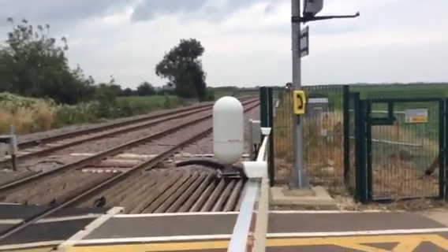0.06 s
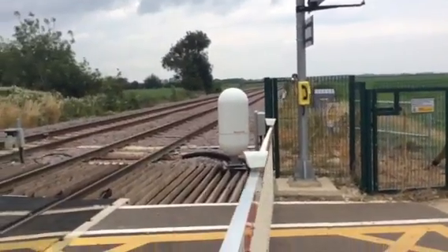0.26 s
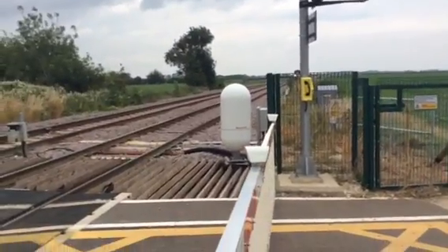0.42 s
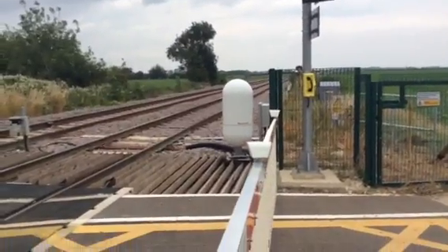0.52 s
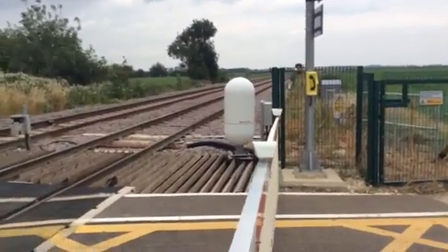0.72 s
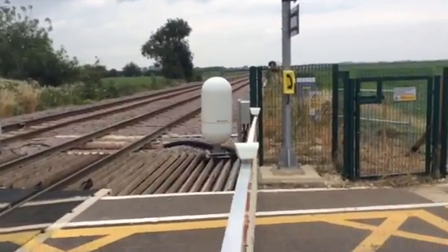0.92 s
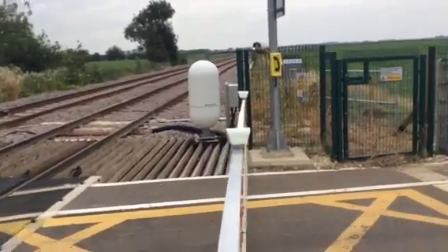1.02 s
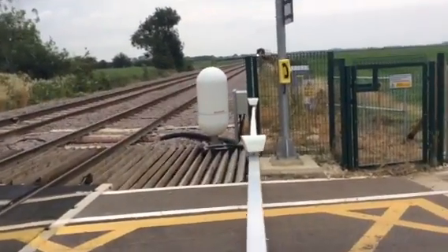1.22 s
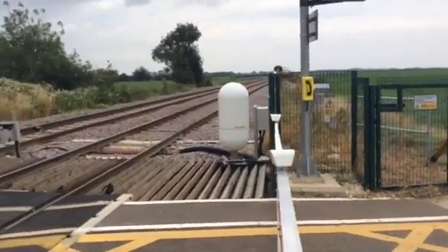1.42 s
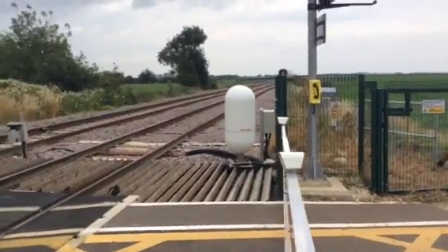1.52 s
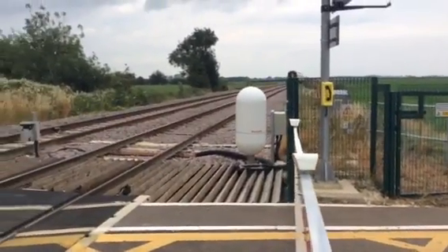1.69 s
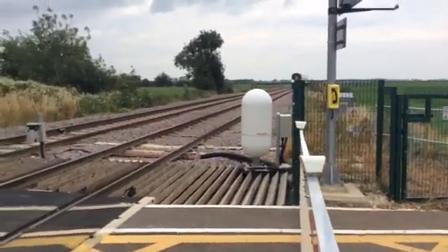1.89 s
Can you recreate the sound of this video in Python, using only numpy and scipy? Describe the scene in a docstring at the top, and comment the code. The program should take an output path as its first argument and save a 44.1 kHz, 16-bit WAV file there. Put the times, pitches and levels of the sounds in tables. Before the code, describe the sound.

Steel rails whine and ring from a distant train, with wind bumping the microphone.

```python
"""Singing rails at a country crossing

One microphone at a quiet level crossing. A far-off train sets the rails ringing: a cluster of narrow
whining resonances, the strongest of which swells and stops, over a wash that grows and brightens.
Wind rumbles and bumps on the microphone; a distant bird holds one thin note over a faint hiss."""
import sys
import numpy as np
from scipy import signal
from scipy.fft import rfft, irfft
from scipy.io import wavfile

SR = 44100
rng = np.random.default_rng(int(sys.argv[2]) if len(sys.argv) > 2 else 0)


def master_out(mix):
    """Clip the mix to full scale and print it as 16-bit PCM to the path in sys.argv[1]."""
    frames = np.transpose(np.atleast_2d(mix))
    ceiling = np.clip(frames, -1, 1)
    pcm = np.round(ceiling * 32767).astype(np.int16)
    wavfile.write(sys.argv[1], SR, pcm)


N = 85995


def undb(db):
    """Decibels to gain."""
    return 10 ** (np.asarray(db) / 20)


def clock():
    """Time of every sample in seconds."""
    return np.arange(N) / SR


def curves(table):
    """The columns of a table, joined by straight lines in time."""
    rows = np.array(table, float)
    return [np.interp(clock(), rows[:, 0], column) for column in rows[:, 1:].T]


def shaped(gain):
    """Noise of rms 1 whose spectrum follows gain(hz)."""
    hz = np.maximum(np.arange(N // 2 + 1) * SR / N, 1)
    x = irfft(rfft(rng.standard_normal(N)) * gain(hz), N)
    return x / x.std()


def noise(spectrum):
    """Noise coloured by (freq_hz, relative_db) points, dying away beyond the ends."""
    hz, db = np.array(spectrum, float).T

    def gain(f):
        skirts = np.minimum(1, np.minimum(f / hz[0], hz[-1] / f)) ** 2
        return undb(np.interp(np.log(f), np.log(hz), db)) * skirts
    return shaped(gain)


def ring(hz, half_width_hz):
    """A resonance kept ringing by random pushes."""
    return shaped(lambda f: 1 / (1 + ((f - hz) / half_width_hz) ** 2))


def waver(rate_hz):
    """A slow random wavering of spread 1."""
    return shaped(lambda f: 1 / (1 + (f / rate_hz) ** 2) ** 2)


def tone(hz):
    """A sine of rms 1 on a moving pitch."""
    return np.sqrt(2) * np.sin(2 * np.pi * (np.cumsum(hz) / SR + rng.random()))


def swell(peak_s, half_length_s):
    """A smooth rise and fall around one moment."""
    return np.exp(-.5 * np.minimum(((clock() - peak_s) / half_length_s) ** 2, 100))


def rise(db_per_s):
    """Gain that grows steadily; 1 half way through."""
    return undb(db_per_s * (clock() - N / SR / 2))


# Rail resonances at the crossing, middle and high: pitch_hz, half_width_hz, relative_db
RAIL_MODES = [(1090, 14, -69), (1125, 14, -69), (1181, 6, -62), (1238, 9, -65), (1345, 14, -65),
              (1453, 8, -67), (1549, 10, -67), (1615, 12, -73), (1712, 9, -72), (1760, 8, -75),
              (1840, 9, -75), (1946, 8, -71), (2093, 8, -75)]
RAIL_HIGH_MODES = [(7080, 350, -86), (10240, 900, -80.5), (13300, 600, -80.5)]
# Colours of the rails' dull and bright washes: freq_hz, relative_db
DULL_WASH_SPECTRUM = [(600, -22), (900, -17), (1100, -6.5), (1300, 0.5), (1550, -12), (1780, -12),
                      (2050, -23), (2400, -28.5)]
BRIGHT_WASH_SPECTRUM = [(700, -35), (950, -12.5), (1150, -4.5), (1300, -0.5), (1650, -2), (1950, -5.5),
                        (2100, -9), (2200, -14.5), (2450, -22), (3000, -48)]
# The two washes, with the train still far down the line: time_s, dull_db, bright_db
WASH_LEVELS = [(0, -55.5, -72), (.5, -55.5, -66.5), (.65, -52.5, -64), (1.1, -56.5, -57),
               (1.22, -57, -56.5), (1.35, -57, -60), (1.6, -62, -54), (1.95, -60, -51.5)]
# A thin top tone off the rails: time_s, level_db
THIN_TONE_LEVELS = [(0, -102), (.55, -92), (1.0, -81), (1.25, -77), (1.5, -80), (1.95, -77)]


def rails():
    """Distant wheels keep the rails ringing in narrow resonances and a wash, louder as they near."""
    modes = sum(undb(db) * ring(hz, width) for hz, width, db in RAIL_MODES)
    modes = undb(-1.5) * modes * rise(db_per_s=7.5)
    high_modes = sum(undb(db) * ring(hz, width) for hz, width, db in RAIL_HIGH_MODES)
    dull_db, bright_db = curves(WASH_LEVELS)
    wash = undb(dull_db) * noise(DULL_WASH_SPECTRUM) + undb(bright_db) * noise(BRIGHT_WASH_SPECTRUM)
    thin_tone = undb(curves(THIN_TONE_LEVELS)[0]) * ring(hz=11480, half_width_hz=110)
    return modes + high_modes * rise(db_per_s=3) + wash + thin_tone


# Tones of the rails' whine, lowest first: pitch_hz, wander_hz, relative_db
WHINE_TONES = [(1290.5, 1.5, -4), (1321, 6, -10), (1345, 2, 0), (1363, 6, -6.5), (1453, 3, -13),
               (1552, 4, -14)]
# The whine's swell, heard from the crossing: time_s, lowest_tone_db, upper_tones_db
WHINE_LEVELS = [(0, -55, -68), (.12, -66, -74), (.25, -47, -62.5), (.45, -61.5, -59.5), (.6, -50, -54),
                (.85, -70, -52.5), (1.02, -44.5, -49.5), (1.175, -68, -47.5), (1.21, -73, -62),
                (1.4, -72, -95)]


def rail_whine():
    """A few nearly pure rail tones beat together, swell and stop."""
    lowest_db, upper_db = curves(WHINE_LEVELS)
    out = 0
    for k, (hz, wander_hz, db) in enumerate(WHINE_TONES):
        swell_db = upper_db if k else lowest_db
        flutter_db = 0.96 * waver(rate_hz=29)
        out += undb(db + swell_db + flutter_db) * tone(hz + wander_hz * waver(rate_hz=22.5))
    return out


# Gusts right on the microphone: time_s, rumble_db, flutter_db
GUST_LEVELS = [(0, -49, -52.5), (.12, -41, -61), (.22, -41.5, -54), (.3, -40, -43.5), (.345, -40.5, -38.5),
               (.378, -38.5, -55.5), (.435, -37.5, -33.5), (.468, -40, -38.5), (.49, -40.5, -46),
               (.53, -31, -34), (.575, -54, -64), (.66, -50.5, -96), (.71, -66, -80), (.77, -47.5, -62),
               (.86, -53.5, -79), (1, -46, -57), (1.035, -56, -61), (1.07, -48, -39.5), (1.1, -37.5, -48),
               (1.135, -52, -66.5), (1.23, -59, -88), (1.62, -57, -74), (1.73, -51.5, -52),
               (1.82, -53.5, -70.5), (1.95, -55, -67)]
# Colours of their rumble and flutter: freq_hz, relative_db
RUMBLE_SPECTRUM = [(15, -26), (30, -13), (50, 3.5), (80, 1.5), (140, 3), (200, -3), (300, -13.5),
                   (500, -44), (900, -61)]
FLUTTER_SPECTRUM = [(50, -17), (120, 1.5), (200, 3.5), (310, 0), (420, -1), (600, -8.5), (800, -26),
                    (1100, -34), (2000, -55)]


def wind():
    """A low rumble, with ragged flutter when the gusts reach the microphone."""
    rumble_db, flutter_db = curves(GUST_LEVELS)
    rumble = undb(rumble_db + 1.5 * waver(rate_hz=38)) * noise(RUMBLE_SPECTRUM)
    flutter = undb(flutter_db + 2.0 * waver(rate_hz=47)) * noise(FLUTTER_SPECTRUM)
    return rumble + flutter


# Brief soft rustles at the crossing: peak_s, half_length_s, level_db
RUSTLES = [(0.001, 0.024, -59.5), (0.185, 0.016, -67), (0.29, 0.036, -73), (0.752, .025, -68),
           (.825, 0.015, -68.5)]
# Colours of the country air all around and of the rustles: freq_hz, relative_db
AIR_SPECTRUM = [(200, 4.5), (500, -4.5), (850, 2), (2400, -5), (3300, -5), (4500, -9.5), (6200, -18),
                (8500, -15), (10500, -14), (12500, -16), (14000, -19), (15500, -15)]
RUSTLE_SPECTRUM = [(2500, 0.5), (4500, -3.5), (6000, -6.5), (8500, -4), (12000, -1), (15000, -16)]


def country_air():
    """Faint hiss that slowly grows, and a few soft rustles."""
    hiss = undb(-67) * rise(db_per_s=4) * noise(AIR_SPECTRUM)
    rustling = sum(undb(db) * swell(peak_s, half_s) for peak_s, half_s, db in RUSTLES)
    return hiss + rustling * noise(RUSTLE_SPECTRUM)


# A bird's note, far from the microphone: time_s, pitch_hz
BIRD_PITCH = [(0, 5220), (.14, 5150), (.17, 5085), (.2, 5055), (.27, 5095), (.4, 5090)]
# The same note as it reaches the crossing: time_s, level_db
BIRD_LEVELS = [(0, -89), (.11, -75), (.145, -72.5), (.2, -70), (.27, -72.5), (.37, -82.5), (.41, -100)]


def bird(wander_hz=14, side_tone_below_hz=200):
    """One thin held whistle that sags a little, with a weaker tone below."""
    hz = curves(BIRD_PITCH)[0] + wander_hz * waver(rate_hz=100)
    level_db = curves(BIRD_LEVELS)[0] + 2.2 * waver(rate_hz=60)
    return undb(level_db) * (tone(hz) + undb(-14) * tone(hz - side_tone_below_hz))


# Eddies striking the microphone: peak_s, peak_db, centre_hz, half_length_cycles, churn_db
EDDIES = [(.245, -26.5, 287, 1.32, -44), (.288, -21, 240, 0.38, -44), (.335, -20.5, 253, 0.32, -38.5),
          (.344, -19.5, 185, 0.56, -33), (.359, -30, 150, 0.56, -53), (.391, -20, 151, 0.36, -69),
          (.406, -27, 383, 0.53, -55), (.431, -28.5, 280, 2.5, -44), (.483, -25, 330, 0.31, -48),
          (.506, -13.5, 161, 0.38, -31.5), (.514, -25, 275, 1.15, -37), (.528, -15.5, 140, 0.61, -37.5),
          (.661, -36, 85, 0.69, -88), (.763, -40, 158, 1.8, -84), (0.999, -33.5, 265, 0.87, -64),
          (1.061, -26.5, 244.4, 0.99, -46), (1.091, -28, 287, 1.03, -55), (1.298, -44.5, 83, 1.06, -78),
          (1.562, -53.5, 66, 1.7, -73), (1.698, -25, 192, 0.54, -68), (1.741, -47, 280, 0.6, -62),
          (1.795, -44, 84, 1.13, -68)]
# Colour of the air churning inside them: freq_hz, relative_db
CHURN_SPECTRUM = [(150, -43), (350, -3), (550, 6), (750, -7.5), (1000, -24), (1800, -43)]


def wind_bumps():
    """Each eddy is a quick, sharp-topped swing of pressure with churning air inside."""
    out, churn = np.zeros(N), noise(CHURN_SPECTRUM)
    for peak_s, db, hz, cycles, churn_db in EDDIES:
        half_s = cycles / hz / np.sqrt(2)
        narrowness = (2 * np.pi * hz * half_s) ** 2
        # A pulse whose spectrum peaks at hz; the narrower its band, the more swings it makes.
        pressure = np.real((1 - 2j * np.pi * hz * (clock() - peak_s) / narrowness) ** -(narrowness + 1))
        out += undb(db) * pressure + undb(churn_db) * swell(peak_s, half_s) * churn
    return out


# Late surges in the rails at the crossing: peak_s, half_length_s, level_db
RAIL_SURGES = [(1.427, 0.054, -71), (1.695, 0.025, -52.5), (1.889, 0.034, -49.5)]


def rail_surges(pitch_hz=1181, wander_hz=4.17):
    """One rail resonance sings out in short swells, each louder than the last."""
    envelope = sum(undb(db) * swell(peak_s, half_s) for peak_s, half_s, db in RAIL_SURGES)
    return envelope * tone(pitch_hz + wander_hz * waver(rate_hz=30))


def scene():
    """Rails, wind, air and bird at one microphone."""
    return (rails() + rail_whine() + wind() + country_air() + bird() + wind_bumps() + rail_surges())[None]


def record(dry):
    """The recorder cuts the top steeply."""
    cutoff_hz = 15150
    return signal.sosfilt(signal.ellip(10, .2, 70, cutoff_hz, fs=SR, output="sos"), dry)


dry = scene()
out = record(dry)
master_out(out)
```